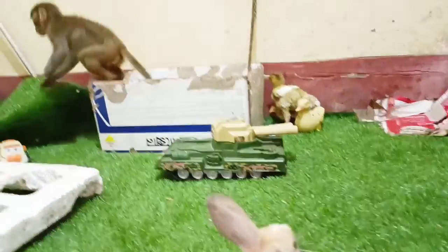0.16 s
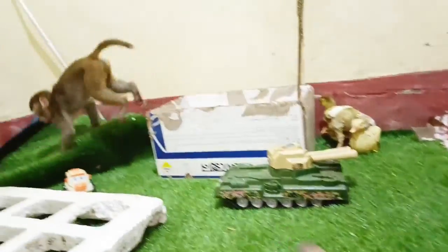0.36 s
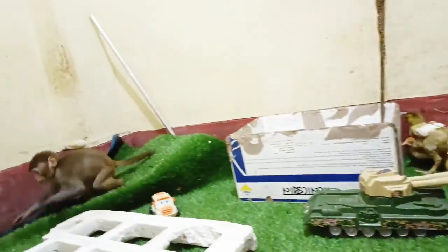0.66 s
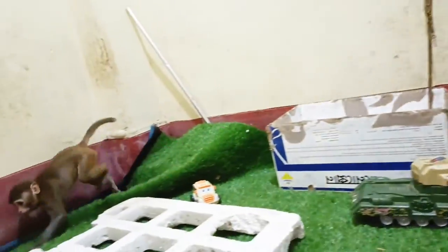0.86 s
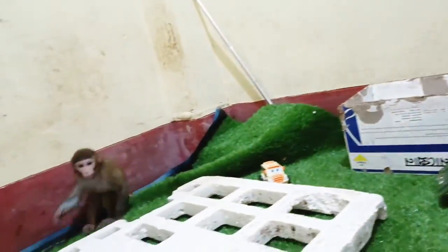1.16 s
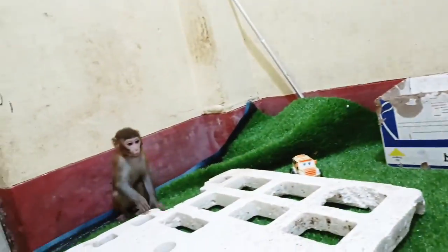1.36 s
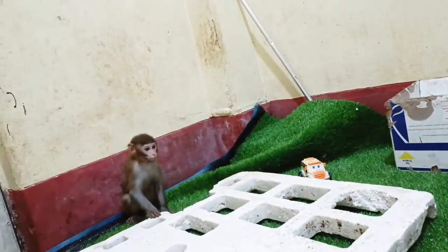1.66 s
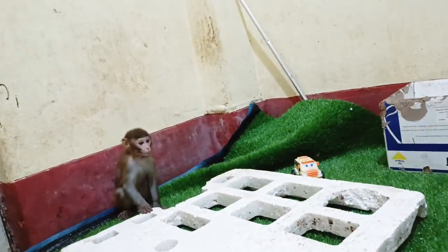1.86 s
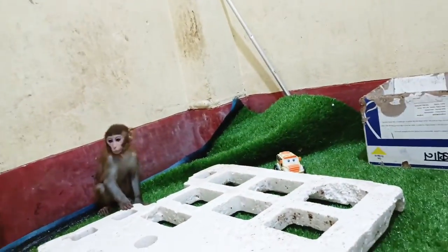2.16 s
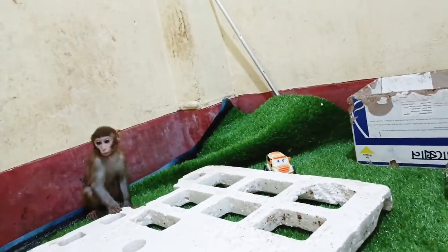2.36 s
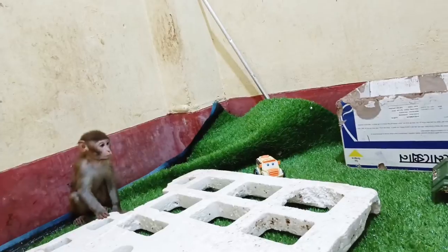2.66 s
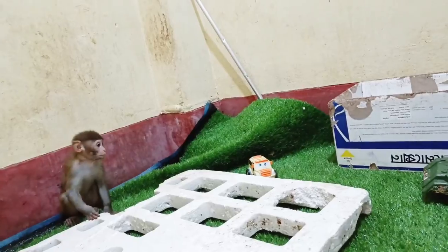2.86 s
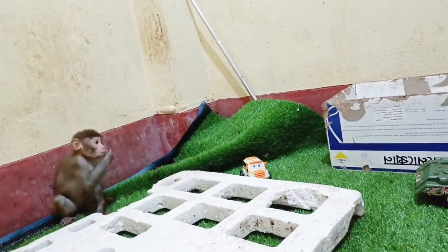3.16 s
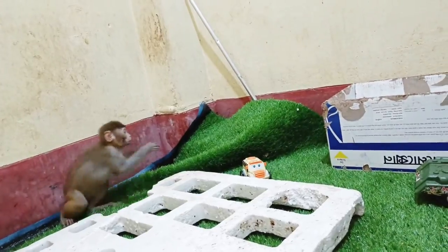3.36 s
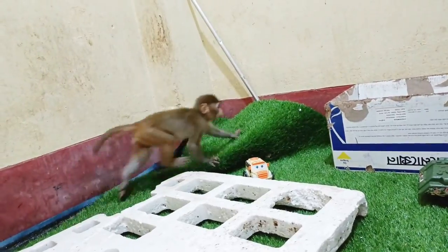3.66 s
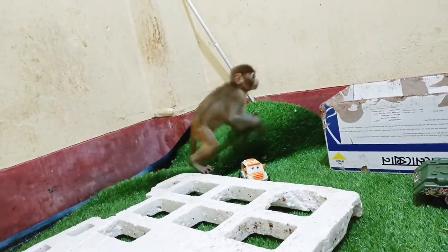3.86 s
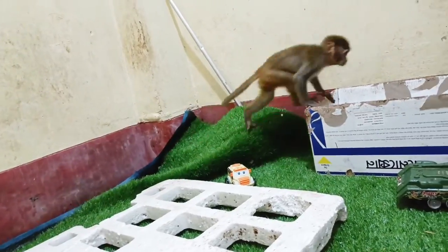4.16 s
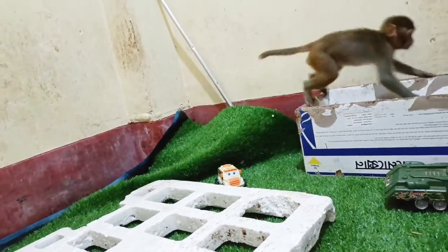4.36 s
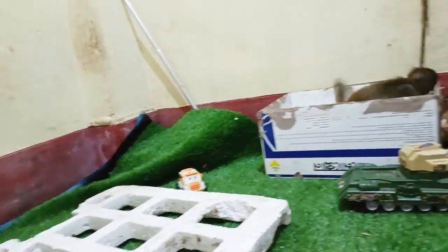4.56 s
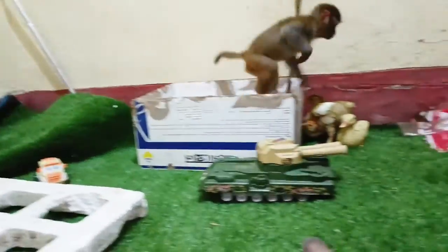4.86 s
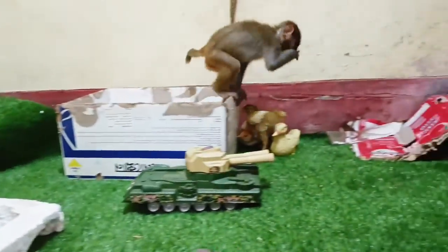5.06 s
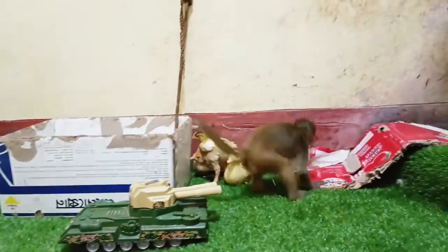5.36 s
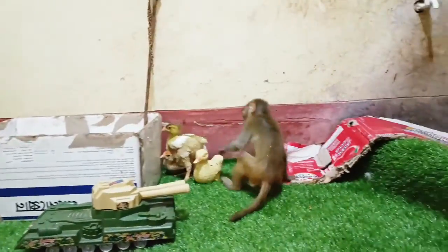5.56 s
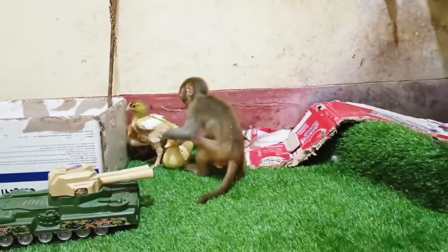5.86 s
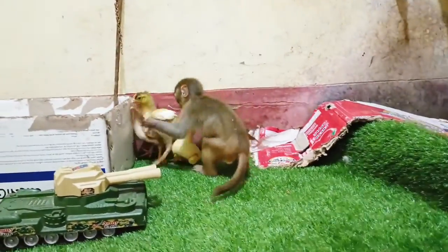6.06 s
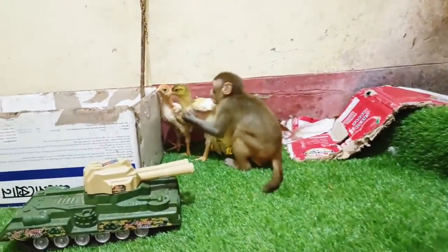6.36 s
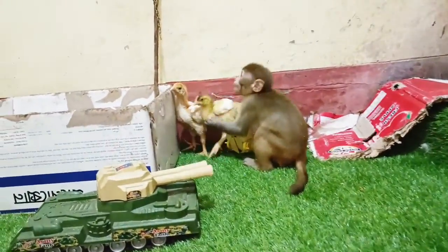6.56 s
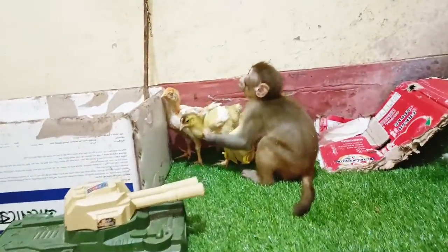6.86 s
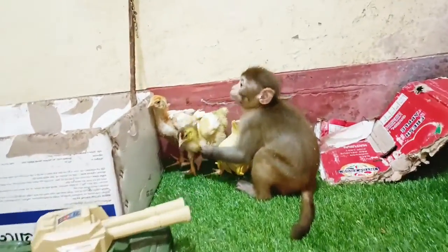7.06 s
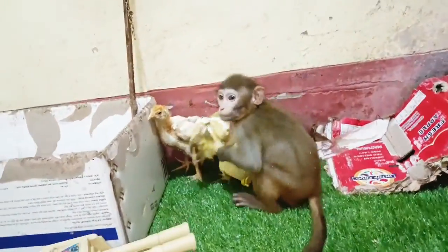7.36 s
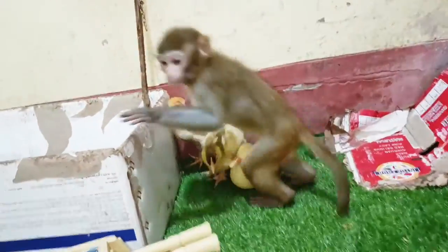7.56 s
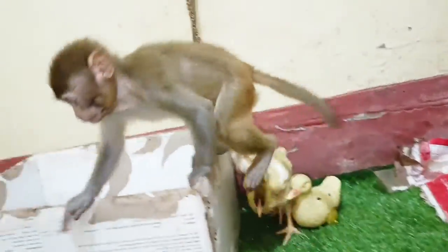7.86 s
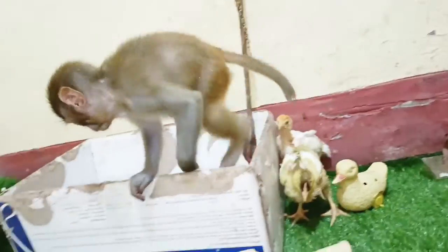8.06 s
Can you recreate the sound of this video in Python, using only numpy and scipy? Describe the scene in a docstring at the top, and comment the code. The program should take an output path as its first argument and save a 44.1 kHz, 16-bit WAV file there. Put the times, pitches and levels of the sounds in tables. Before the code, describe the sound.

A young bird cries loudly and hoarsely, again and again, for almost four seconds, echoing off hard walls. Early paw knocks on a hollow box fade, then return in a cluster once the cries stop. Light scuffs on artificial grass, thin wavering metallic ringing and tiny gliding peeps follow, with a last couple of box thumps. Phone-like stereo pickup with faint steady hum.

```python
"""Rasping bird cries and a monkey on a box

A young bird gives five loud, rasping cries in a bare, echoing room, after the tail of an earlier one; then
chicks peep softly. Cries are stacked partials that roughen and break into hiss; peeps are gliding whistles.
A small monkey clambers over a hollow cardboard box (ringing low modes and noise slaps), lands on plastic turf
and rustles (showers of clicks). Something metallic rings faintly (wavering partials); the room hums low (noise).
"""
import sys
import numpy as np
from scipy import signal
from scipy.fft import rfft, irfft
from scipy.io import wavfile
from scipy.ndimage import uniform_filter1d, minimum_filter1d

SR = 44100
rng = np.random.default_rng(int(sys.argv[2]) if len(sys.argv) > 2 else 0)


def wav_record(signal):
    """Record a signal, one row per channel, as 16-bit PCM in the file named by sys.argv[1]."""
    frames = np.transpose(np.atleast_2d(signal))
    bounded = np.clip(frames, -1, 1)
    # unit amplitude maps onto the largest positive 16-bit level
    quanta = np.round(bounded * 32767).astype(np.int16)
    wavfile.write(sys.argv[1], SR, quanta)


N = 361113  # length of the scene in samples
TIME = np.arange(N) / SR  # seconds


def gain_of(db):
    """Decibels to amplitude."""
    return 10 ** (np.asarray(db) / 20)


def evened(x):
    """Scales a sound to an rms of one."""
    return x / np.sqrt(np.mean(x ** 2) + 1e-20)


def read(points, hz):
    """Reads a table between its points, on a log-frequency axis."""
    f, value = np.transpose(points)
    return np.interp(np.log(hz + 1), np.log(f + 1), value)


def add(mix, start_s, sound):
    """Mixes a sound in at its start time; what comes before time zero is dropped."""
    at = round(start_s * SR)
    sound = sound[max(-at, 0):]
    part = mix[max(at, 0):][:len(sound)]
    part += sound[:len(part)]


def bins(x):
    """Frequencies in the spectrum of x."""
    return np.fft.rfftfreq(x.shape[-1], 1 / SR)


def coloured(x, db):
    """Filters x by a gain in dB for each frequency."""
    return irfft(rfft(x) * gain_of(db), x.shape[-1])


def noise(points):
    """Random hiss with the given spectrum and an rms of one."""
    return evened(coloured(rng.standard_normal(N), read(points, bins(TIME))))


def wobble(size, hz):
    """Random wavering with an rms of one, fading out above hz times a second."""
    raw = rng.standard_normal(N // 8 + size)
    slow = coloured(raw, -10 * np.log10(1 + (bins(raw) / hz) ** 4))
    return evened(slow[:size])


# How alike the two channels are: pitch_hz, likeness (0-1)
LIKENESS = [(150, 0.94), (300, 0.76), (550, 0.72), (1000, 0), (16000, 0)]


def paired(two):
    """Two close microphones share the bass and differ in the treble."""
    a, b = rfft(two)
    same = np.clip(read(LIKENESS, bins(two)), -1, 1)
    second = same * a + np.sqrt(1 - same ** 2) * b
    return irfft(np.array([a, second]), two.shape[-1])


# How long the echo takes to fall by 60 dB: pitch_hz, fade_s
ECHO_FADE = [(150, 1), (500, 0.94), (1500, 0.76), (3000, 0.68), (6000, 0.66), (10000, 0.43), (15000, 0.34)]


def room(x, wet_db, gap_s=0.0024):
    """Direct sound plus dense reflections from bare walls, each band dying at its own speed."""
    taps = paired(rng.standard_normal((2, SR)))
    hz, t, bands = signal.stft(taps, SR, nperseg=256)
    fading = gain_of(-60 * t / read(ECHO_FADE, hz)[:, None])
    tail = signal.istft(bands * fading, SR)[1][:, :SR]
    tail *= TIME[:SR] > gap_s  # the first reflection comes after a short gap
    tail /= np.linalg.norm(tail[0])
    wet = signal.fftconvolve(x[None], tail, axes=1)[:, :N]
    return (x + gain_of(wet_db) * wet) / np.sqrt(1 + gain_of(2 * wet_db))


# Shape of the room noise: pitch_hz, relative level_db
ROOM_NOISE = [(25, -29), (55, -14), (90, -14), (140, 2), (210, -8), (350, -13.5), (650, -12), (1100, -13),
              (1600, -16), (2900, -13.5), (4200, -19), (6300, -23), (9000, -33), (16000, -34)]
# Faint steady tones, before a shared lift: pitch_hz, level_db
ROOM_TONES = [(2223, -70), (2815, -70), (3085, -68), (3311, -73), (3628, -71)]


def background(wash_db=-50, tones_db=3):
    """Steady room noise with a low hum and a few faint tones that waver in strength."""
    wash = gain_of(wash_db) * paired(np.array([noise(ROOM_NOISE), noise(ROOM_NOISE)]))
    tones = np.zeros(N)
    for hz, db in ROOM_TONES:
        strength = gain_of(db) * (1 + 0.57 * wobble(N, 6.4))
        tones += strength * np.sin(2 * np.pi * hz * TIME)
    return wash + gain_of(tones_db) * tones


# Sets of metallic partials; levels count only within a set. Each: pitch_hz, relative level_db
FULL_RING = [(2024, -58), (2320, -64), (2767, -52), (2929, -64), (3230, -48), (4048, -49), (4258, -57),
             (4915, -59), (6767, -62.5)]
DULL_RING = [(2040, -58), (2767, -61), (4027, -61), (4888, -63), (5211, -62.5)]
HIGHER_RING = [(2347, -73), (3074, -68), (3505, -68), (3876, -68), (4460, -65), (4910, -71), (6923, -74),
               (11709, -71)]
# a close pair of partials that whines: pitch_hz, relative level_db
WHINING_PAIR = [(4090, 4), (4170, 2.5)]
THIN_PAIR = [(2795, -0.5), (5900, -6.5)]
FAINT_SET = [(2229, -71), (2815, -59), (3063, -63), (3348, -62), (3720, -78)]
# Each swell of ringing, before the room: start_s, length_s, level_db, name of the set
RING_SWELLS = [(4.069, 0.29, -50, "low"), (4.662, 0.22, -48.5, "thin"), (4.727, 0.21, -52, "whine"),
               (5.217, 0.3, -44, "full"), (5.264, 0.38, -48.5, "whine"), (6.201, 0.18, -57, "high"),
               (6.654, 0.22, -56.5, "high"), (6.923, 0.54, -57, "faint"), (8.021, 0.18, -68, "thin")]


def ringing(waver_hz=7, taper=0.42):
    """Inharmonic partials that swell and fade together, each wavering in strength and phase."""
    sets = {"full": FULL_RING, "low": DULL_RING, "high": HIGHER_RING,
            "whine": WHINING_PAIR, "thin": THIN_PAIR, "faint": FAINT_SET}
    out = np.zeros(N)
    for start_s, length_s, db, name in RING_SWELLS:
        t = np.arange(0, length_s, 1 / SR)
        tone = 0
        for hz, partial_db in sets[name]:
            # a wavering complex number moves both strength and phase
            waver = wobble(len(t), waver_hz) + 1j * wobble(len(t), waver_hz)
            tone = tone + gain_of(partial_db) * waver * np.exp(2j * np.pi * hz * t)
        swell = signal.windows.tukey(len(t), taper)
        add(out, start_s, gain_of(db) * evened(tone.real) * swell)
    return out


# Scuffs on turf, card and feathers: start_s, length_s, relative level_db, centre_hz, width_octaves
SCUFF_LIST = [(4.141, 0.19, -54, 6140, 0.45), (4.397, 0.012, -36, 1275, 0.073),
              (4.589, 0.067, -53.5, 5800, .5), (4.642, .14, -43, 5400, 0.45), (5.415, 0.058, -55, 5360, .6),
              (5.458, 0.068, -35, 1030, 0.92), (5.484, 0.0081, -26.5, 1170, 0.26),
              (5.703, 0.031, -49, 1060, 0.1), (6.055, 0.074, -48, 1030, 0.31), (6.135, .11, -62, 5000, 3.5),
              (6.156, 0.028, -39.5, 1086, 0.1), (6.287, 0.026, -43, 3540, 0.54),
              (6.456, .037, -61, 3500, 3), (6.936, 0.046, -51, 1180, 0.12), (7.237, 0.011, -44.5, 3900, .5),
              (7.423, 0.057, -39.5, 4930, 0.44), (7.426, 0.047, -39, 13000, .55),
              (7.523, 0.19, -46, 1340, 0.8), (7.639, .14, -45.5, 4940, 3.5),
              (7.764, 0.0046, -31, 3500, 0.74), (7.768, 0.0284, -39.5, 1090, 0.33)]


def scuffs(grain_db=1.5, level_db=1):
    """Each scuff is a brief shower of tiny clicks in one band."""
    out = np.zeros(N)
    for start_s, length_s, db, hz, octaves in SCUFF_LIST:
        size = int(length_s * SR)
        # some clicks are far louder than the rest
        grains = gain_of(grain_db * np.minimum(rng.exponential(1, size), 5))
        clicks = rng.standard_normal(size) * grains
        distance = np.log2((bins(clicks) + 1) / hz) / octaves
        band = evened(coloured(clicks, -10 * np.log10(1 + distance ** 4)))
        add(out, start_s, gain_of(db + level_db) * band * signal.windows.tukey(size, .5))
    return out


# Paws on the box: start_s, relative level_db
PAW_STEPS = [(.001, -22.5), (0.061, -21), (0.127, -25.5), (.204, -12), (.217, -11), (.289, -14),
             (0.357, -15), (.413, -14), (.574, -20), (4.147, -37), (4.21, -33.5), (4.326, -27),
             (4.485, -29.5), (4.576, -20), (4.654, -16.5), (4.698, -16.5), (4.761, -20.5), (4.85, -21.5),
             (4.971, -26), (5.069, -23.5), (5.196, -30.5), (5.421, -31.5), (7.908, -22.5), (7.993, -27.5)]
# Low ringing modes of the box, before a small random detune: pitch_hz, relative level_db, fade_s (by 60 dB)
BOX_MODES = [(128, -4, 0.13), (145.3, 2, 0.26), (170.3, 2.5, 0.13), (201.7, 2.5, 0.16), (257, -1, 0.12),
             (304, -6, 0.082)]


def thumps(level_db=-2, contact_s=0.0028):
    """Each paw pushes the hollow box into its low modes, slightly detuned from step to step."""
    out, t = np.zeros(N), TIME[:SR // 2]
    detunes = rng.normal(1, 0.033, (len(PAW_STEPS), len(BOX_MODES)))
    for (start_s, db), detune in zip(PAW_STEPS, detunes):
        ring = np.zeros(len(t))
        for (hz, mode_db, fade_s), shift in zip(BOX_MODES, detune):
            ring += gain_of(mode_db - 60 * t / fade_s) * np.sin(2 * np.pi * hz * shift * t)
        soft_onset = (1 - np.exp(-t / contact_s)) ** 2
        add(out, start_s, gain_of(db + level_db) * ring * soft_onset)
    return out


# Hard landings on the flaps: start_s, relative level_db, flap_hz (its resonance), treble_db
HARD_LANDINGS = [(.36, -33, 500, 0), (.412, -22, 420, 0), (.445, -29, 1100, 0), (4.657, -32, 520, -3),
                 (4.6995, -19.5, 440, -5), (4.76, -35, 650, -3), (4.845, -40, 600, -3),
                 (8.079, -25, 800, -6)]
# Colour of a slap: pitch_hz, relative level_db
SLAP_COLOUR = [(100, -14), (170, -5), (280, 1), (450, -1), (620, -2), (850, -4), (1200, -9), (1700, -21),
               (2600, -34), (6000, -43), (15000, -55)]
SLAP_DB, SLAP_FADE_S = 3, .14  # slow part; fades are times to fall by 60 dB
CRACK_DB, CRACK_FADE_S = 7, .022  # quick part
TREBLE_HZ = 1000  # a soft landing loses treble above this


def slaps(flap_db=5, rise_s=.0008):
    """Hard landings crack and rattle a flap: noise around its resonance, with a quick and a slow fade."""
    out, t = np.zeros(N), TIME[:SR // 2]
    hz = bins(t)
    for start_s, db, flap_hz, treble_db in HARD_LANDINGS:
        colour = read(SLAP_COLOUR, hz) + flap_db * np.exp(-((hz - flap_hz) / 150) ** 2)
        colour += treble_db * hz ** 4 / (hz ** 4 + TREBLE_HZ ** 4)
        rattle = evened(coloured(rng.standard_normal(len(t)), colour))
        fade = gain_of(SLAP_DB - 60 * t / SLAP_FADE_S) + gain_of(CRACK_DB - 60 * t / CRACK_FADE_S)
        add(out, start_s, gain_of(db) * rattle * fade * (1 - np.exp(-t / rise_s)) ** 2)
    return out


def box():
    """A small box radiates almost nothing below its lowest mode, so its thumps and slaps lose the deep bass."""
    both = room(thumps(), wet_db=-7) + room(slaps(), wet_db=3.5)
    no_bass = signal.cheby1(6, 1, 126, "highpass", fs=SR, output="sos")
    return signal.sosfilt(no_bass, both)


# Soft peeps: start_s, length_s, first_hz, middle_hz, last_hz, relative level_db
PEEP_LIST = [(4.857, 0.11, 2393, 2482, 2376, -42), (5.033, 0.03, 2690, 2950, 2540, -43),
             (5.854, .025, 3910, 3550, 3230, -43.5), (5.871, .043, 3670, 3160, 2990, -36),
             (6.015, 0.079, 3210, 2620, 2340, -38.5), (6.083, 0.054, 2743, 2465, 1990, -43),
             (6.307, 0.028, 2950, 2685, 2930, -34.5), (7.517, 0.043, 2790, 3190, 2800, -35),
             (7.547, 0.0282, 2715, 3000, 2230, -29.5), (7.565, 0.024, 2460, 3060, 2580, -39),
             (7.666, 0.029, 3336, 2920, 2170, -36), (7.69, .022, 2250, 2747, 2280, -32),
             (7.717, .025, 2714, 2440, 2090, -37)]
# Louder peeps are brighter: the overtone at the loud level, and its change per dB of level
LOUD_PEEP_DB, OVERTONE_DB, OVERTONE_SLOPE = -30, -11, 0.65


def peeps(quiver=0.007, scratch=.11, quiver_hz=190, flutter=0.38, level_db=1):
    """Short whistles with one overtone; the wider the glide, the scratchier the note."""
    out = np.zeros(N)
    for start_s, length_s, first_hz, middle_hz, last_hz, db in PEEP_LIST:
        overtone_db = OVERTONE_DB + OVERTONE_SLOPE * (db - LOUD_PEEP_DB)
        u = np.linspace(0, 1, int(length_s * SR))
        curve = np.polyfit([0, .5, 1], [first_hz, middle_hz, last_hz], 2)
        pitch = np.polyval(curve, u)
        unsteady = quiver + scratch * np.ptp(pitch) / middle_hz
        phase = 2 * np.pi * np.cumsum(pitch * (1 + unsteady * wobble(len(u), quiver_hz))) / SR
        swell = signal.windows.tukey(len(u), .4) * (1 + flutter * wobble(len(u), quiver_hz))
        whistle = np.sin(phase) + gain_of(overtone_db) * np.sin(2 * phase)
        add(out, start_s, gain_of(db + level_db) * np.sqrt(2) * swell * whistle)
    return out


# Balance of sound from the birds' corner: pitch_hz, left_minus_right_db
CORNER_BALANCE = [(1700, -2.5), (3300, -3.5), (4600, -8), (5800, -12), (6500, -6.5), (7100, 3.5), (7900, 7),
                  (9200, 19.5), (10800, 9), (12500, 0.5), (13400, 8), (14400, -15), (15600, -8)]


def from_corner(two):
    """The phone's body shades each microphone differently for sound from the side."""
    tilt = read(CORNER_BALANCE, bins(two))
    gains = gain_of(np.array([tilt, -tilt]) / 2)
    gains /= np.sqrt(np.mean(gains ** 2, 0))  # keeps the power of the two together
    return irfft(rfft(two) * gains, N)


# Every cry scoops up to its top pitch, then sags towards the same spent pitch
SCOOP, SPENT_HZ = .11, 1491  # scoop as a share of the top pitch
SCOOP_POWER = 2.7  # a higher power flattens the top of the arch


def cry_pitch(t, top_hz, rise_s, sag_s, abruptness):
    """Pitch scoops up to its top, lingers, then slides down a bell curve as the bird tires."""
    climbing = top_hz * (1 - SCOOP * abs(1 - t / rise_s) ** SCOOP_POWER)
    sagging = SPENT_HZ + (top_hz - SPENT_HZ) * np.exp(-abs((t - rise_s) / sag_s) ** abruptness)
    return np.where(t < rise_s, climbing, sagging)


# It swells from a soft start, changes level slightly as it tires, and stops short
SOFT_START_DB, ATTACK_S, TIRED_DB, RELEASE_S = -15.5, 0.021, -0.5, 0.0063
TIRING = 2.96  # power of elapsed time by which the voice tires
# Partials above the second: level at the start and end of a cry, and a lag for each higher partial
FRESH_DB, DIMMED_DB, DULL_START_DB = 1, -1, -0.5
DRIFT, FALTER, DRIFT_HZ = .003, .00895, 14  # slow pitch wander: fresh share, added when tired, speed
JITTER, STRAIN, FLUTTER_HZ = .0016, .0058, 260  # fast pitch shake: fresh share, added when rough, speed
SHIMMER = .011  # fast shake of the loudness, as a share
# A tired voice also beats at a fraction of its pitch, which puts side tones between the partials
BEAT_RATIO, BEAT_DEPTH, BEAT_WANDER = .36, .2, .1
HOARSE = .25  # unevenness of the cycles in a rough voice, radians
# Hiss relative to the voice: steady breath, extra at the start, extra with roughness, closing break
BREATHY_DB, CATCH_DB, HOARSE_DB, BREAK_DB = -57, 26, 36, -22.5
SPUTTER_DB = 2.5  # unevenness of the hiss
# The throat's colour on the voice: pitch_hz, relative level_db
THROAT_COLOUR = [(1450, -23.5), (1900, -18.5), (2900, 4.5), (3750, -4), (4500, -11.5), (5300, -4.5),
                 (6100, 0.5), (7100, -13.5), (8000, -15.5), (9100, -12), (10200, -22), (12500, -20),
                 (13300, -29), (15500, -19.5)]
# The throat's colour on the hiss: pitch_hz, relative level_db
HISS_COLOUR = [(100, -45), (600, -21), (1500, -11), (2200, 0.5), (3200, 10.5), (4100, 2.5), (5200, -1.5),
               (6200, 9), (7500, -33), (9000, -2), (11000, -9.5), (13200, -15), (15500, -26)]
# Cries: start_s, length_s, relative level_db, top_hz, rise_s (to the top), sag_s (to sag),
# abruptness (power of the sag), hoarseness (0-1), break_s (length of the closing hiss)
CRY_LIST = [(-.41, 0.43, -15, 1867, 0.16, 0.23, 2, 0.37, 0.0086),
            (0.178, 0.61, -19.5, 1888, .115, .31, 2.3, 0.57, 0.054),
            (1.007, 0.44, -20.5, 1875, 0.16, .17, 2.6, 0.75, 0.062),
            (1.702, 0.57, -20.5, 1828, .135, .215, 2.9, 0.77, 0.034),
            (2.513, 0.56, -20.5, 1801, .115, .215, 2.5, 0.94, 0.057),
            (3.369, 0.41, -19.5, 1799, 0.11, 0.15, 2.17, 0.81, 0.061)]


def cries():
    """An arching harmonic cry that falters and grows hoarse as its pitch sags, then breaks into sputtering hiss."""
    out, hiss = np.zeros(N), np.zeros(N)
    for start_s, length_s, db, top_hz, rise_s, sag_s, abruptness, hoarseness, break_s in CRY_LIST:
        t = np.arange(0, length_s, 1 / SR)
        size = len(t)
        starting = np.exp(-t / ATTACK_S)
        tired = (t / length_s) ** TIRING
        rough = hoarseness * tired

        wander = 1 + (DRIFT + FALTER * tired) * wobble(size, DRIFT_HZ)
        pitch = cry_pitch(t, top_hz, rise_s, sag_s, abruptness) * wander
        shake = 1 + (JITTER + STRAIN * rough) * wobble(size, FLUTTER_HZ)
        phase = 2 * np.pi * np.cumsum(pitch * shake) / SR
        beat_hz = BEAT_RATIO * pitch * (1 + BEAT_WANDER * wobble(size, 59.8))
        beat = np.sin(2 * np.pi * np.cumsum(beat_hz) / SR)
        # uneven cycles blur the upper partials into rasp
        smear = rough * (HOARSE * wobble(size, 560) + BEAT_DEPTH * beat)

        bright = FRESH_DB + (DIMMED_DB - FRESH_DB) * t / length_s
        voice = np.zeros(size)
        for k in range(1, 11):
            colour = read(THROAT_COLOUR, k * pitch)
            if k > 2:  # the higher a partial, the later it sets in
                colour = colour + bright + DULL_START_DB * (k - 2) * starting
            voice += gain_of(colour) * np.sin(k * phase + smear * max(k - 2, .5))

        loud = gain_of(db + SOFT_START_DB * starting + TIRED_DB * tired)
        loud = loud * signal.windows.tukey(size, 2 * RELEASE_S / length_s)
        add(out, start_s, np.sqrt(2) * loud * voice * (1 + SHIMMER * wobble(size, FLUTTER_HZ)))
        # the voice also catches as it starts
        add(hiss, start_s, gain_of(BREATHY_DB + CATCH_DB * starting + HOARSE_DB * rough) * loud)
        closing = gain_of(BREAK_DB) * hoarseness * signal.windows.tukey(int(break_s * SR), .3)
        add(hiss, start_s + length_s - RELEASE_S, closing)
    sputter = evened(gain_of(SPUTTER_DB * wobble(N, 150)))
    return out + hiss * noise(HISS_COLOUR) * sputter


def scene():
    """Background, ringing, scuffs, box and birds share one room."""
    # paired gains are left and right, in dB
    turf = room(scuffs(), wet_db=3.5) * gain_of([[-1], [1.5]])
    chicks = room(peeps(), wet_db=1) * gain_of([[-1], [2.5]])
    crying = from_corner(room(cries(), wet_db=3.5)) * gain_of(4.5)
    return background() + room(ringing(), wet_db=1.5) + turf + box() + chicks + crying


def record(dry, knee_db=-14, squeeze=0.34, edge_hz=15900):
    """Gain control evens out loud sound, a fast limiter holds down peaks; then the top treble is cut."""
    power = abs(uniform_filter1d((dry ** 2).mean(0), size=900))
    excess_db = np.maximum(10 * np.log10(power + 1e-12) - knee_db, 0)
    level = dry / gain_of(squeeze * uniform_filter1d(excess_db, size=400))
    headroom = np.minimum(1, .95 / (abs(level).max(0) + 1e-9))
    held = level * uniform_filter1d(minimum_filter1d(headroom, size=400), size=400)
    low_pass = signal.firwin(511, edge_hz, window=("kaiser", 9), fs=SR)
    return signal.oaconvolve(held, low_pass[None], "same")


dry = scene()
out = record(dry)
wav_record(out)
```